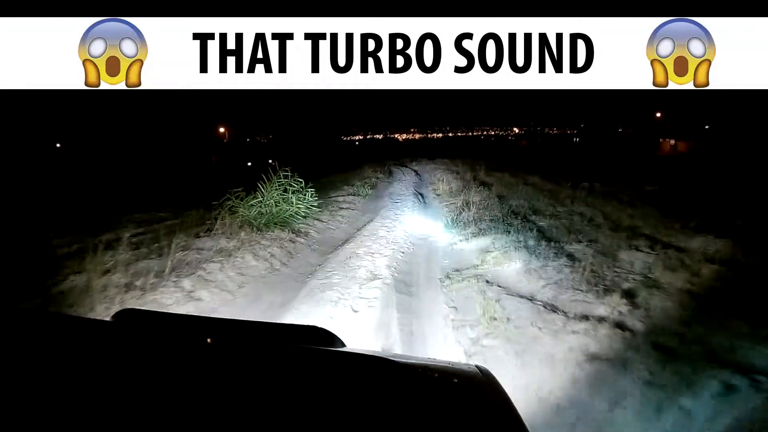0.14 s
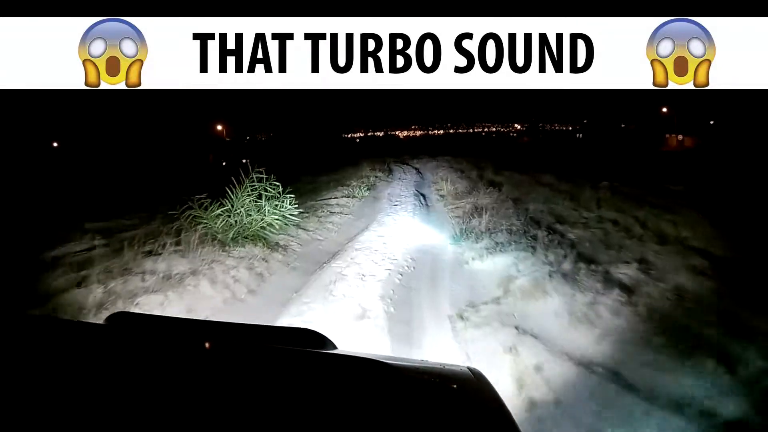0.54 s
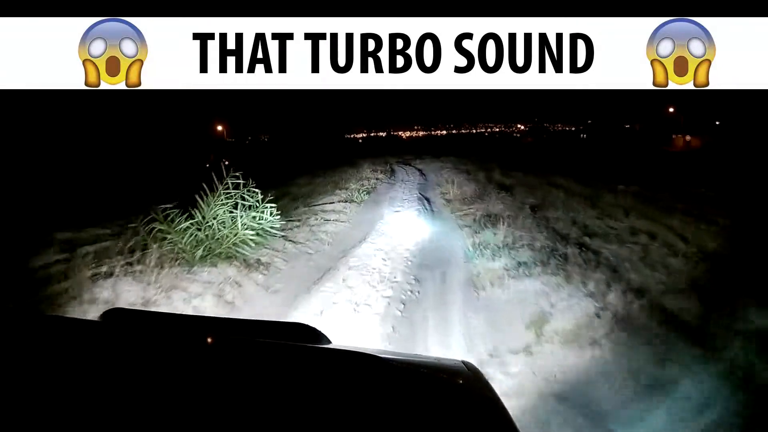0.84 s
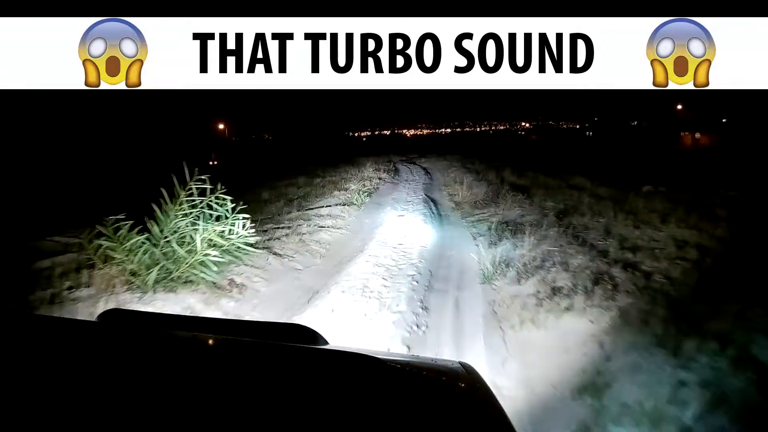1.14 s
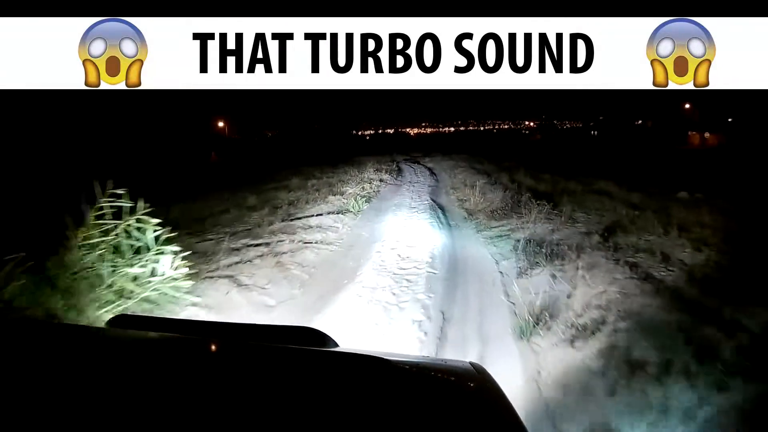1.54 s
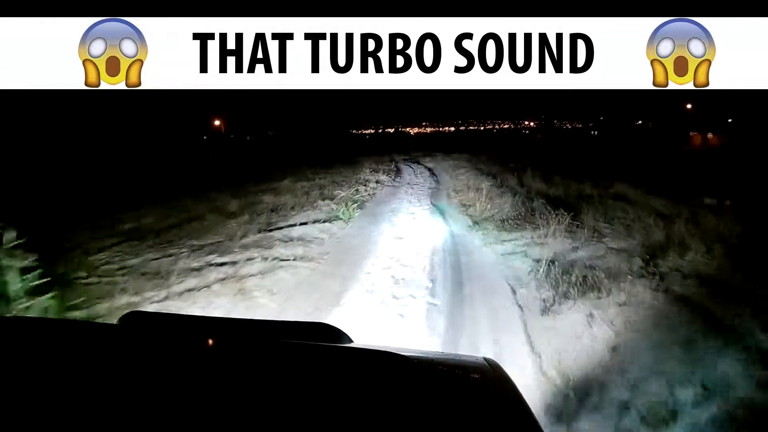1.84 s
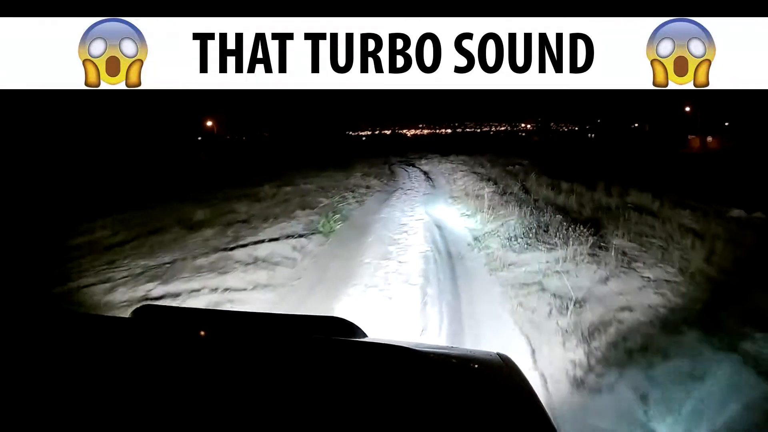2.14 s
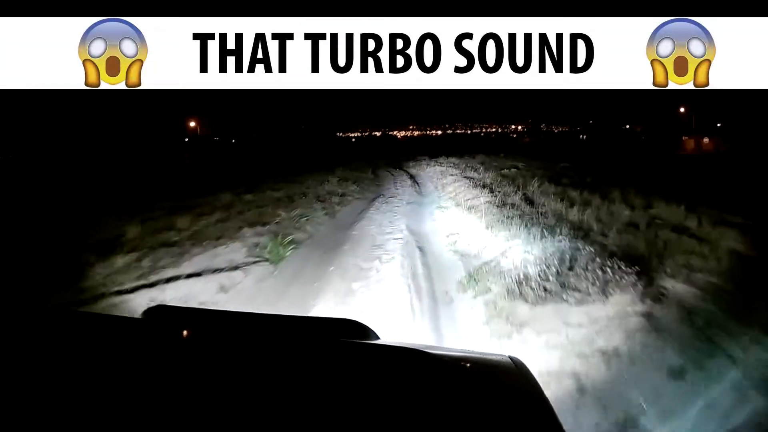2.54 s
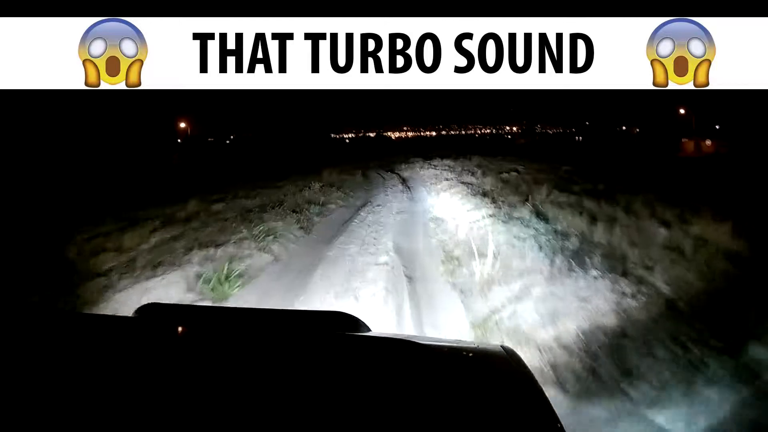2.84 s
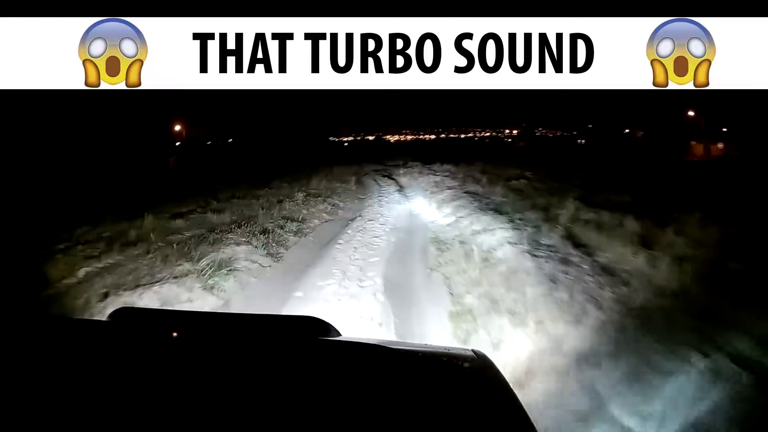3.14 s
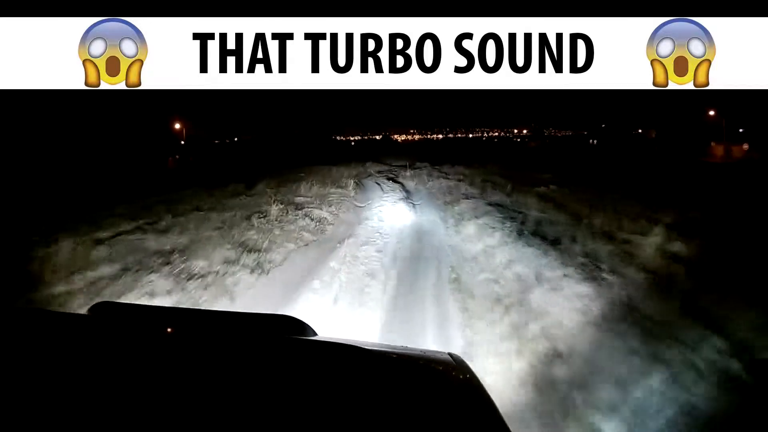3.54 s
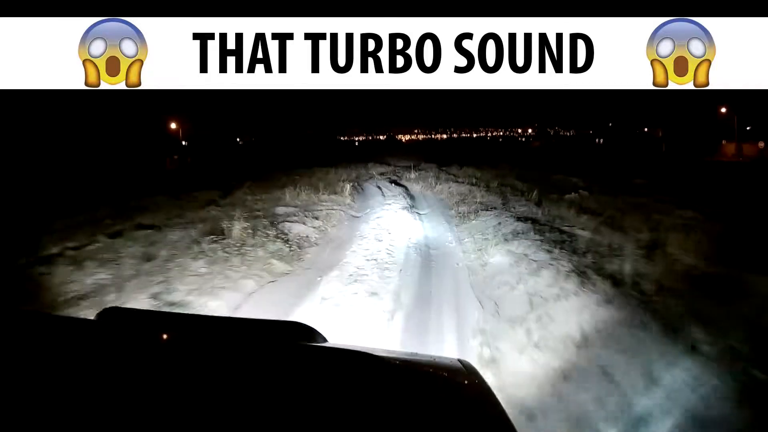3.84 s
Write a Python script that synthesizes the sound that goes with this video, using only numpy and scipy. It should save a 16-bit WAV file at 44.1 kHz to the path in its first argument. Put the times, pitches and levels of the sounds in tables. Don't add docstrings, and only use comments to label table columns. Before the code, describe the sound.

A turbocharged V8 creeps along a dirt track, a quiet low burble with faint gear whine and hiss for about 1.9 seconds. Then it pulls: exhaust pitch climbs nearly threefold, roar and bright air rush swell, and a thin turbo whistle rises from about 2.3 seconds, piercing after 3.1. At 3.74 the whistle stops; sharp valve knocks and four fading flutter puffs follow until about 4 seconds. Resonant, boxy microphone, identical in both channels.

```python
import sys
import numpy as np
from scipy import signal
from scipy.fft import rfft, irfft
from scipy.io import wavfile
from scipy.ndimage import uniform_filter1d

SR = 44100
rng = np.random.default_rng(int(sys.argv[2]) if len(sys.argv) > 2 else 0)


def inscribe(sig):
    pcm = np.round(np.clip(np.atleast_2d(sig).T, -1, 1) * 32767)
    wavfile.write(sys.argv[1], SR, pcm.astype(np.int16))


def invert_db(level):
    return 10 ** (np.asarray(level, dtype=float) / 20)


N = 176400
T = np.arange(N) / SR
HZ = np.maximum(np.arange(N // 2 + 1) * SR / N, 1)

# time in seconds, firing rate in Hz, air rush level in dB.
ENGINE_RUN = [(0.0, 104.6, -60), (0.05, 107.6, -62), (0.68, 113.5, -60.5), (1.85, 118.1, -61),
              (1.94, 113, -53.5), (2.04, 135.6, -53), (2.14, 149.6, -48.5), (2.48, 182.6, -42),
              (2.53, 186.4, -41.5), (2.78, 219.2, -36.5), (2.97, 241, -34), (3.1, 252.3, -34.5),
              (3.31, 295, -25), (3.4, 310.3, -23.5), (3.69, 343.0, -22), (3.76, 344.7, -21)]
# multiple of the camshaft rate, level creeping in dB, level at full load in dB.
EXHAUST_ORDERS = [(1, -76, -60), (2, -68, -48), (3, -70, -48.5), (4, -70, -50), (5, -64, -50),
                  (6, -64, -58), (7, -63.5, -58), (8, -53, -40), (9, -67, -59), (10, -66, -58.5),
                  (11, -65.5, -47), (13, -76, -48), (14, -77, -61), (15, -69, -62), (16, -66, -58.5),
                  (19, -76, -61), (20, -71, -61)]
BODY_HZ, BODY_WIDTH_HZ, BODY_DB = 100, 60, 6
PIPE_DIP_HZ, PIPE_DIP_WIDTH_HZ, PIPE_DIP_DB = 190, 45, -6
ORDER_WOBBLE_DB, LOAD_CURVE = 3.0, 0.9
OVERRUN_DB_PER_KHZ, OVERRUN_S = -25.5, 0.14

# time in seconds, main mesh in Hz, its level in dB, other gears relative in dB.
GEAR_WHINE = [(0, 371.7, -64, -1), (1.4, 400.2, -68, -1), (1.9, 414.9, -64, -11), (2.1, 465, -63, -16),
              (2.3, 532, -59, -15), (2.6, 589.7, -59, -16), (2.8, 640, -75, -15)]
# ratio to the main mesh, level in dB.
OTHER_GEARS = [(1.186, -3), (1.62, -3)]
GEAR_WOBBLE_DB = 3.0

# frequency in Hz, level in dB.
RUMBLE_COLOUR = [(20, -23), (50, -19), (100, -4.5), (180, -14), (390, -13), (600, -20), (760, -24),
                 (950, -32)]
ROAR_COLOUR = [(60, -7), (130, 1), (250, -3), (400, -5.5), (600, -2.5), (780, -4), (950, -17.5),
               (1100, -28)]
CLATTER_COLOUR = [(800, 2.5), (1500, 0.5), (3500, -8.5), (6300, -21), (10000, -24), (15000, -26)]
INTAKE_COLOUR = [(800, 2), (1500, 0), (3500, 0), (6300, -4), (10000, -9), (15000, -15)]
JET_COLOUR = [(800, -9), (1500, -5), (3500, -3), (6300, 0.5), (10000, 1.5), (15000, 1.5)]
BLOWBACK_COLOUR = [(800, -11), (1500, -6.5), (3500, -0.5), (6300, -6), (10000, -7), (15000, -7.5)]
RUMBLE_DB, ROAR_DB, CLATTER_DB, INTAKE_DB, JET_DB = -56.5, -37, -58.5, -27.5, -23.8
RUMBLE_GAIN_DB, ROAR_GAIN_DB, CLATTER_GAIN_DB, INTAKE_GAIN_DB, JET_GAIN_DB = 10, 22, 14, 46, 62
INTAKE_FULL_LOAD = 0.84
FIRING_GATE = 0.12

# time in seconds, frequency in Hz, level in dB.
BLADE_TONE = [(2.2, 2700, -80), (2.31, 3250, -50), (2.6, 5000, -55), (2.8, 6300, -48), (3.05, 7900, -52),
              (3.16, 8750, -34), (3.3, 9500, -33), (3.45, 9800, -38), (3.73, 10200, -28.5)]
SECOND_DB, SECOND_FROM_HZ = 0.5, 4700
TURBO_WOBBLE_DB, TURBO_JITTER = 2.5, 0.0012
LIFT_S, LIFT_FADE_S, AIR_FADE_S = 3.735, 0.006, 0.12

# start in seconds, level in dB, ring in Hz, 60 dB decay in seconds.
VALVE_SLAMS = [
    (3.763, -15, 6430, 0.034),
    (3.773, -9, 3300, .016),
    (3.778, -10, 3590, .025),
]
# peak in seconds, level in dB, honk in Hz.
COMPRESSOR_SURGES = [
    (3.776, -22, 635),
    (3.847, -24, 590),
    (3.905, -31, 570),
    (3.958, -32, 560),
]
SURGE_RISE_S, SURGE_FALL_S, SURGE_BED_DB = 0.014, 0.032, -29
HONK_LAG_S, HONK_S, HONK_DB = 0.02, 0.016, -9

# centre in Hz, width in Hz, level in dB.
HOUSING_PEAKS = [(1130, 250, -9), (1478, 327, 1), (2150, 600, -12.5), (3300, 450, 1.5), (3854, 400, 0),
                 (4600, 850, -6), (6145, 480, 2), (6670, 330, -3), (7460, 800, -5), (9000, 900, -7.5),
                 (10000, 355, 1), (10700, 800, -5), (13250, 700, -5.5), (14800, 1600, -5)]
HOUSING_FLOOR_DB, CAB_T60_S, CAB_DB = -18, 0.11, -7
# frequency in Hz, level in dB.
ELECTRONIC_TONES = [(6858, -68.5), (13717, -68.5)]
HISS_DB, CUTOFF_HZ, FADE_S = -66, 15700, 0.035


def rms_one(x):
    return x / np.sqrt(np.mean(x ** 2) + 1e-20)


def in_time(rows):
    s, *columns = np.transpose(rows)
    return [np.interp(T, s, column) for column in columns]


def drift(rate_hz):
    pole = np.exp(-80 * np.pi * rate_hz / SR)
    white = rng.standard_normal(N // 40 + 2002)
    slow = signal.lfilter([1], [1, -2 * pole, pole * pole], white)[2000:]
    return np.interp(np.arange(N) / 40, np.arange(len(slow)), rms_one(slow))


def peak(hz, centre_hz, width_hz):
    return 1 / (1 + (2 * (hz - centre_hz) / width_hz) ** 4)


def tone(hz):
    return np.sqrt(2) * np.sin(2 * np.pi * (np.cumsum(hz) / SR + rng.random()))


def steady_tone(hz):
    return tone(np.full(N, hz))


def noise(colour, shape, patchy_db):
    hz, db = np.transpose(colour)
    gain = invert_db(np.interp(np.log(HZ), np.log(hz), db)) * shape
    spectrum = rfft(rng.standard_normal(N)) * gain
    place = np.clip(np.log(HZ / hz[0]) / np.log(hz[-1] / hz[0]) * 3, 0, 3)
    together = drift(4.0)
    out = 0
    for k in range(4):
        band = irfft(spectrum * np.clip(1 - abs(place - k), 0, 1), N)
        out = out + band * invert_db(patchy_db * (1.03 * together + drift(15.0)))
    return rms_one(out)


def throttle(fade_s):
    return np.clip((LIFT_S - T) / fade_s + 1, 0, 1)


def housing():
    hz = np.arange(0, SR / 2 + 10, 10)
    power = invert_db(2 * HOUSING_FLOOR_DB)
    for centre_hz, width_hz, db in HOUSING_PEAKS:
        power = power + invert_db(2 * db) * peak(hz, centre_hz, width_hz)
    shell = np.interp(HZ, hz, np.sqrt(power))
    tail = rng.standard_normal(4000) * invert_db(-60 * T[:4000] / CAB_T60_S)
    tail = tail / np.sqrt(np.sum(tail ** 2))
    cab = abs(1 + invert_db(CAB_DB) * rfft(tail, N))
    return shell, cab


def exhaust(firing_hz, load):
    shut = 1 - throttle(OVERRUN_S)
    effort = np.clip(load - 0.08, 0, 1) ** LOAD_CURVE
    out = 0
    for order, creep_db, full_db in EXHAUST_ORDERS:
        hz = order * firing_hz / 8
        db = creep_db + (full_db - creep_db) * effort
        db = db + BODY_DB * peak(hz, BODY_HZ, BODY_WIDTH_HZ)
        db = db + PIPE_DIP_DB * peak(hz, PIPE_DIP_HZ, PIPE_DIP_WIDTH_HZ)
        db = db + OVERRUN_DB_PER_KHZ * shut * hz / 1000
        db = db + ORDER_WOBBLE_DB * (1 + 0.6 * load) * drift(8.8)
        out = out + invert_db(db) * tone(hz)
    return out


def driveline():
    hz, db, others_db = in_time(GEAR_WHINE)
    out = invert_db(GEAR_WOBBLE_DB * drift(3.4)) * tone(hz)
    for ratio, level_db in OTHER_GEARS:
        out = out + invert_db(others_db + level_db + GEAR_WOBBLE_DB * drift(3.4)) * tone(ratio * hz)
    return invert_db(db) * out


def rumble_and_roar(load, cab):
    low = 1 / (1 + (HZ / 1100) ** 8)
    rumble = noise(RUMBLE_COLOUR, low, patchy_db=1.0)
    roar = noise(ROAR_COLOUR, low * cab * HZ / (HZ + 30), patchy_db=1.5)
    rumble_db = RUMBLE_DB + RUMBLE_GAIN_DB * load
    roar_db = ROAR_DB + ROAR_GAIN_DB * (load - 1)
    return invert_db(rumble_db) * rumble + invert_db(roar_db) * roar


def air(firing_hz, load, shape):
    gate = 1 + FIRING_GATE * tone(firing_hz)
    clatter_db = CLATTER_DB + CLATTER_GAIN_DB * load
    intake_db = INTAKE_DB + INTAKE_GAIN_DB * np.minimum(load - INTAKE_FULL_LOAD, 0)
    jet_db = JET_DB + JET_GAIN_DB * (load - 1)
    clatter = invert_db(clatter_db) * gate * noise(CLATTER_COLOUR, shape, patchy_db=0.94)
    intake = invert_db(intake_db) * noise(INTAKE_COLOUR, shape, patchy_db=0.75)
    jet = invert_db(jet_db) * noise(JET_COLOUR, shape, patchy_db=1.0)
    return clatter + (intake + jet) * throttle(AIR_FADE_S)


def turbo(shell):
    hz, db = in_time(BLADE_TONE)
    hz = uniform_filter1d(hz, size=4001) * (1 + TURBO_JITTER * drift(40.0))
    first = np.interp(hz, HZ, shell) * tone(hz)
    second_gain = invert_db(SECOND_DB) * np.interp(2 * hz, HZ, shell) ** 1.6
    second_gain = second_gain * np.clip(hz / SECOND_FROM_HZ, 0, 1) ** 5 * (hz < CUTOFF_HZ / 2)
    second = second_gain * tone(2 * hz)
    return invert_db(db + TURBO_WOBBLE_DB * drift(20.0)) * throttle(LIFT_FADE_S) * (first + second)


def slams():
    out = 0
    for s, db, hz, t60_s in VALVE_SLAMS:
        age_s = np.maximum(T - s, 0)
        attack = np.minimum(age_s / 0.0011, 1)
        out = out + invert_db(db - 60 * age_s / t60_s) * np.sin(2 * np.pi * hz * age_s) * attack
    return out


def flutter(shape):
    puffs = invert_db(SURGE_BED_DB) * (1 - throttle(AIR_FADE_S))
    honks = 0
    for s, db, hz in COMPRESSOR_SURGES:
        width_s = np.where(T < s, SURGE_RISE_S, SURGE_FALL_S)
        puffs = puffs + invert_db(db) * np.exp(-((T - s) / width_s) ** 2)
        honk_swell = np.exp(-((T - s - HONK_LAG_S) / HONK_S) ** 2)
        honks = honks + invert_db(db + HONK_DB) * honk_swell * steady_tone(hz)
    return puffs * noise(BLOWBACK_COLOUR, shape, patchy_db=2.0) + honks


def scene():
    firing_hz, rush_db = in_time(ENGINE_RUN)
    firing_hz = uniform_filter1d(firing_hz, size=2001)
    load = np.clip((rush_db - rush_db.min()) / np.ptp(rush_db), 0, 1)
    shell, cab = housing()
    shape = cab * shell * HZ ** 4 / (HZ ** 4 + 800 ** 4)
    mono = exhaust(firing_hz, load) + driveline() + rumble_and_roar(load, cab)
    mono = mono + air(firing_hz, load, shape) + turbo(shell)
    mono = mono + slams() + flutter(shape)
    return np.array([mono, mono])


def band_limit(x):
    return signal.sosfilt(signal.butter(12, 16780, fs=SR, output="sos"), x)


def record(dry):
    x = dry + invert_db(HISS_DB) * rng.standard_normal(N)
    for hz, db in ELECTRONIC_TONES:
        x = x + invert_db(db) * steady_tone(hz)
    x = irfft(rfft(x) * (HZ < CUTOFF_HZ), N)
    fade = np.clip(0.5 + (T[-1] - T) / FADE_S / 2, 0, 1)
    return band_limit(x * fade)


dry = scene()
out = record(dry)
inscribe(out)
```